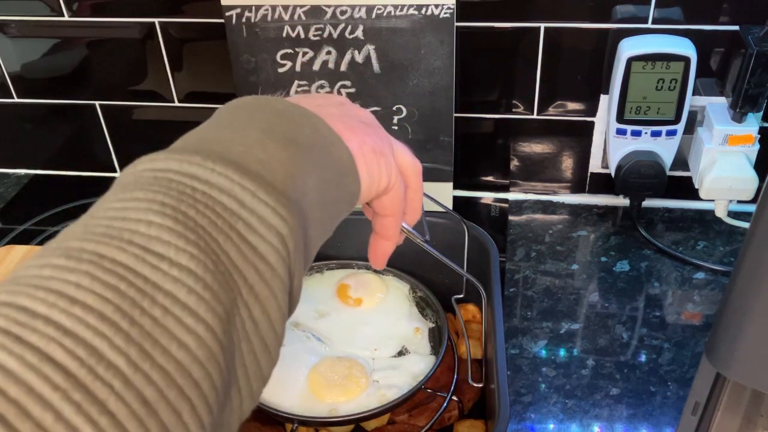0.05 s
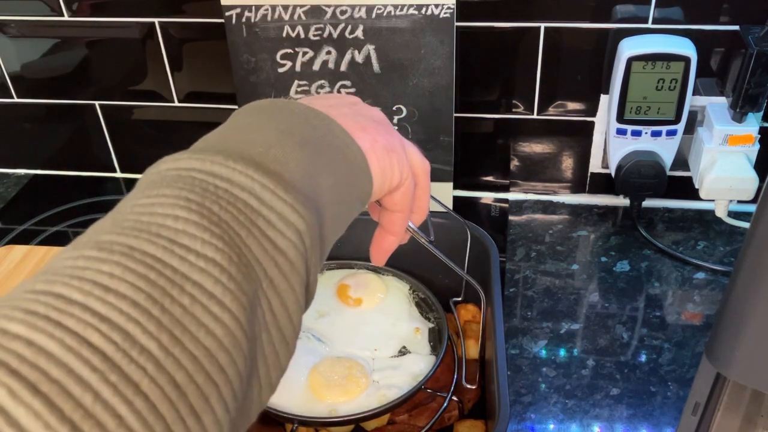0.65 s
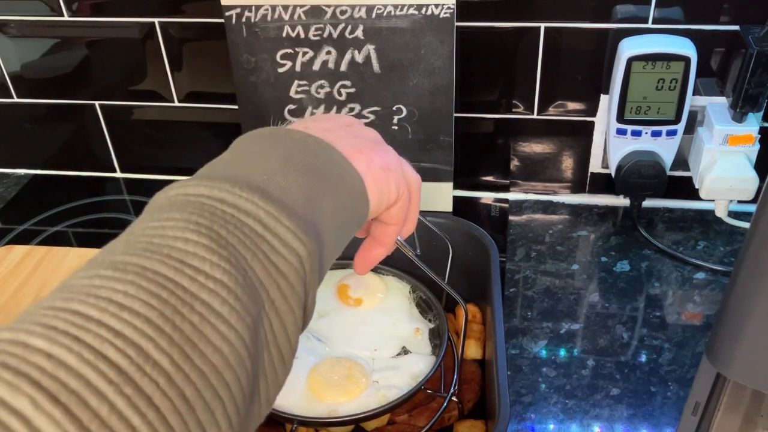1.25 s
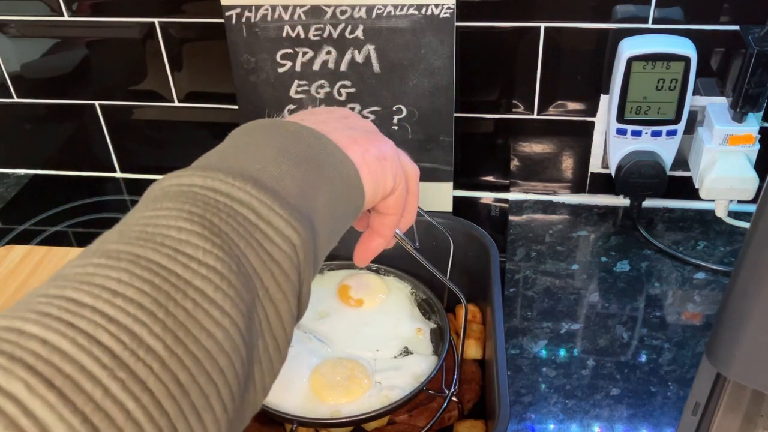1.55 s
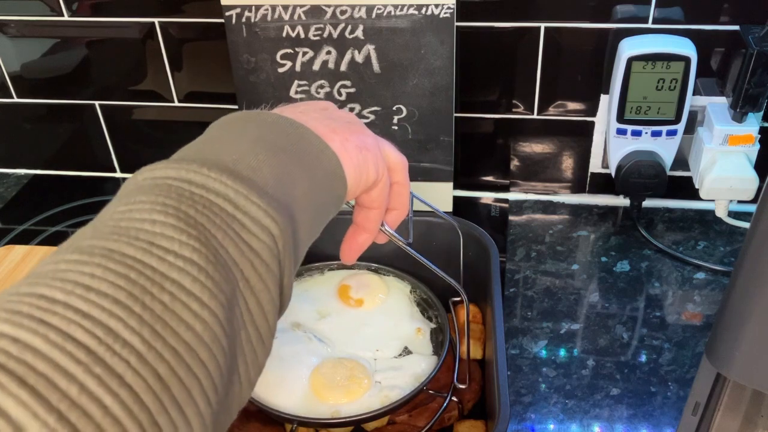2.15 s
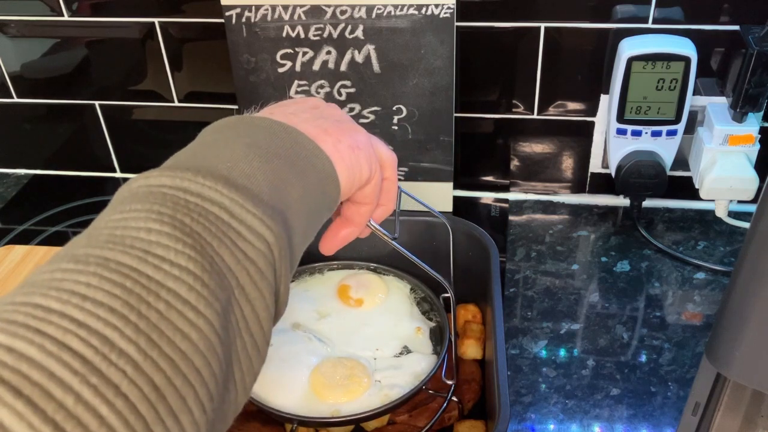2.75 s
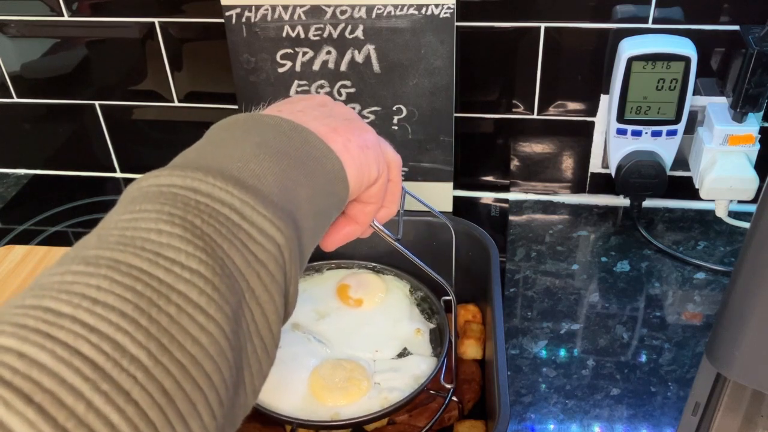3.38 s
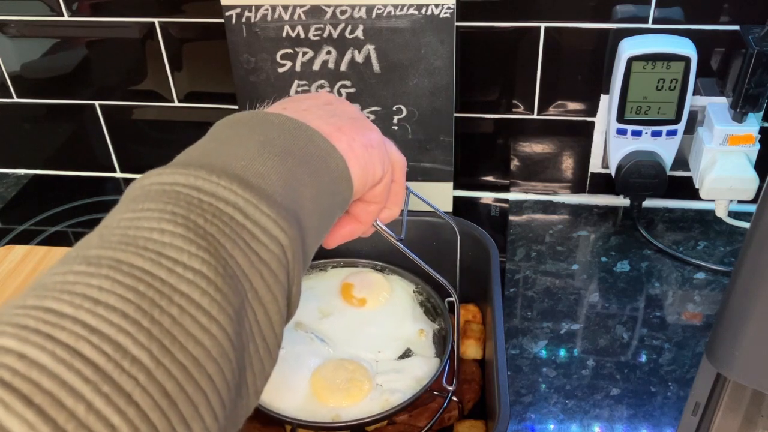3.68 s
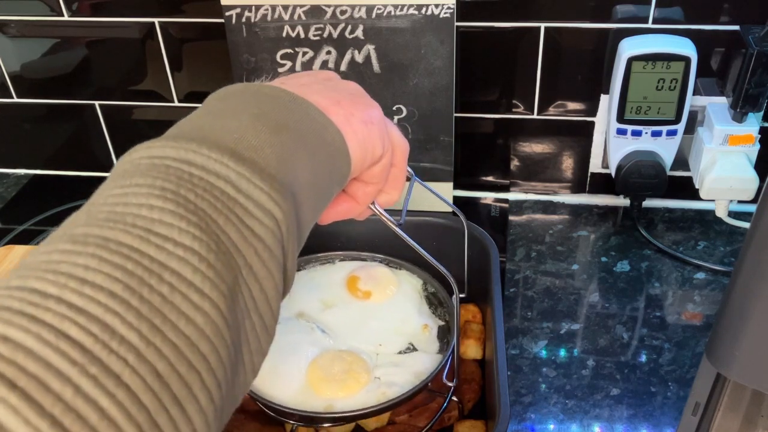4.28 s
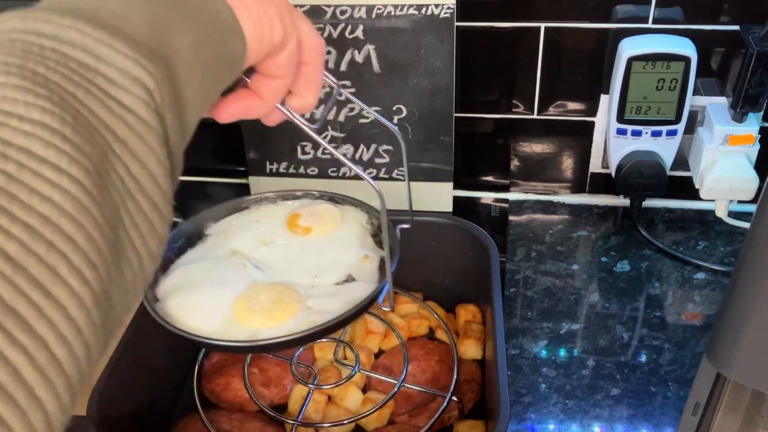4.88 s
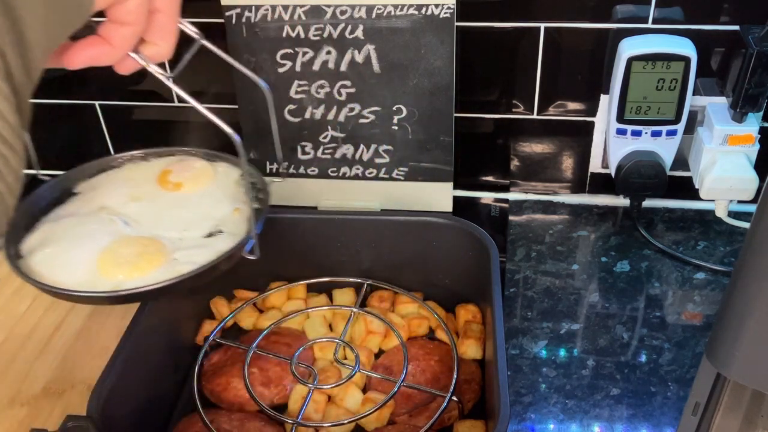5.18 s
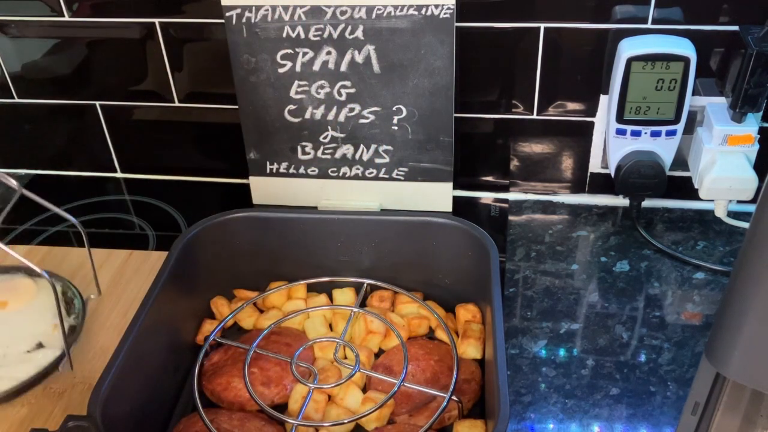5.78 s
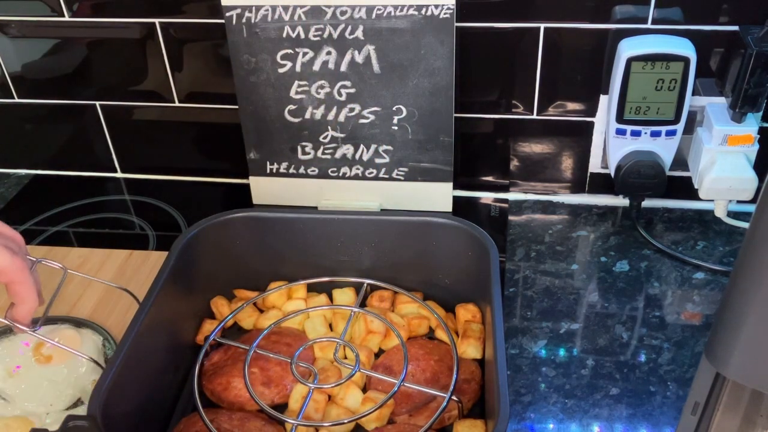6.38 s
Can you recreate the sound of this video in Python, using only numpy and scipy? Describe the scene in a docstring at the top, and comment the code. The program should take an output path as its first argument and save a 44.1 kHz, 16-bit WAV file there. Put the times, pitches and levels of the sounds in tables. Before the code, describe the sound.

A wire handle clinks against a small steel pan, which is lifted with a sleeve rustle and set down on wood with a knock.

```python
"""Lifting a pan out of a cooking basket

A small tiled kitchen, two microphones close in, with their own hiss and a faint crackle of hot food.
A wire handle is hooked onto a small steel pan on a trivet in the basket; each contact rings their modes.
The pan is lifted out with a soft rustle of a sleeve and set down on a wooden board, off to the left,
which thuds on the counter. The tiles answer each contact with a short tail."""
import sys
import numpy as np
from scipy import signal
from scipy.fft import rfft, irfft, next_fast_len
from scipy.io import wavfile
from scipy.ndimage import map_coordinates

SR = 44100
rng = np.random.default_rng(int(sys.argv[2]) if len(sys.argv) > 2 else 0)


def unload_audio(sound):
    """Save the sound as a 16-bit wav file, at the path given as the first command line argument."""
    columns = np.transpose(np.atleast_2d(sound))
    # keep every value between -1 and 1, then stretch to whole-number steps
    steps = np.round(np.clip(columns, -1, 1) * 32767)
    wavfile.write(sys.argv[1], SR, steps.astype(np.int16))


N = 283563

# the handle wire strikes the pan's lugs; where it is struck decides which three of its modes sing:
# (time [s], level [dB], basket share [dB], pan share [dB], wire share [dB], low mode [Hz],
#  middle mode [Hz], high mode [Hz], favoured basket pitch [Hz], favoured handle ping [Hz])
CLINKS = [(0.852, -44, -1, -5.5, -3.5, 1600, 2500, 5130, 460, 6750),
          (0.9893, -38.5, -6, -14, -3, 1410, 5130, 6550, 454, 12100),
          (1.0735, -38.5, -33, -37, -7, 950, 2670, 5130, 465, 9700),
          (1.113, -48.5, -13.5, -22, -3, 940, 1680, 1750, 465, 11400),
          (1.26, -58.5, -1.5, -9, -3, 930, 1605, 2580, 488, 6700),
          (1.328, -46, -19, -8.5, -0.5, 906, 1780, 5850, 465, 9900),
          (2.313, -56.5, -21, -11, -2.5, 935, 1820, 2240, 465, 11400),
          (2.397, -47, -8.5, -7, -2.5, 1680, 1740, 2700, 460, 9500),
          (2.717, -51.5, -11, -18, -6, 1410, 1810, 4240, 565, 6830)]
# ringing of the trivet: (frequency [Hz], level [dB], t60 [s])
TRIVET_MODES = [(1933, -2, .19), (2510, -2, .18), (2562, -3, .17), (2788, 1.5, .16), (3079, 2, .12),
                (3440, 0, .19), (3768, -6, .2), (4584, -1, .18), (4940, -1, .14), (5500, 2, .11),
                (6067, -5, .15), (6783, -1, .1), (7040, -1, .13), (7525, -1, .13), (7983, -3, .12),
                (11150, -3, .11)]
# high pings of the handle: (frequency [Hz], level [dB], t60 [s])
HANDLE_MODES = [(5500, -4, .09), (6390, -1, .1), (6700, -1, .1), (7030, -4, .12), (9400, 3, .08),
                (9900, 0, .08), (11310, -2, .1), (11904, 5.5, .13), (15100, -2, .07)]
# clatter of the trivet, and of the wire as it sings: (frequency [Hz], level [dB])
TRIVET_TONE = [(300, -41), (1100, -12), (2000, 3.5), (3000, 3), (7500, 3), (9000, 2.5), (12000, -2),
               (14000, -17.5)]
# clatter of the handle: (frequency [Hz], level [dB])
HANDLE_TONE = [(1000, -75), (4000, -1.5), (8000, 0), (9500, 5.5), (12200, 3), (15500, -4.5)]
# steel grating on steel: (frequency [Hz], level [dB])
SCRAPE_TONE = [(250, -19.5), (500, -4.5), (800, -11.5), (1500, -8), (2500, 4), (3500, -1.5), (4500, 1),
               (6000, -13), (7800, -9.5), (12000, -30)]


def amp(db):
    return 10 ** (np.asarray(db) / 20)


def along(points, hz):
    """Read a curve of (frequency [Hz], value) points on a log frequency axis."""
    f, v = np.transpose(points)
    return np.interp(np.log(hz + 1), np.log(f), v)


def unit(x):
    """Scaled to rms 1."""
    return x / np.sqrt(np.mean(x ** 2) + 1e-20)


def unit_attack(x):
    """Scaled to rms 1 over the first 20 ms."""
    return x / np.sqrt(np.mean(x[..., :SR // 50] ** 2) + 1e-20)


def coloured(x, spectrum, ripple_db=0, ripple_hz=200):
    """Filter x by a (frequency [Hz], gain [dB]) curve with random peaks and dips about ripple_hz apart."""
    m = 2 * next_fast_len(x.shape[-1] // 2 + 2048)
    hz = np.fft.rfftfreq(m, 1 / SR)
    ripple = map_coordinates(rng.standard_normal(512), [hz / ripple_hz], mode="mirror")
    cepstrum = irfft(np.log(amp(along(spectrum, hz) + ripple_db * np.tanh(ripple))))
    cepstrum[1:m // 2] *= 2  # folding the cepstrum makes the filter causal
    cepstrum[m // 2 + 1:] = 0
    return irfft(rfft(x, m) * np.exp(rfft(cepstrum)), m)[..., :x.shape[-1]]


def add(track, s, sound):
    """Mix a sound into the track at time s."""
    part = track[:, round(s * SR):][:, :sound.shape[-1]]
    part += sound[:, :part.shape[-1]]


def kitchen(x, wet_db):
    """A sound followed by a new tail from the tiles, different at each microphone."""
    # decay of the tiled room: (frequency [Hz], t60 [s])
    decay = [(100, 0.821), (500, 0.3), (3000, 0.34), (8000, 0.27), (15000, 0.025)]
    hz, t, noise = signal.stft(rng.standard_normal((2, SR // 2)), SR, nperseg=256)
    build_up = 1 - np.exp(-t / 0.0027)
    fade = amp(-60 * t / along(decay, hz)[:, None])
    tail = signal.istft(noise * build_up * fade, SR, nperseg=256)[1]
    wet = signal.fftconvolve(x, tail / np.linalg.norm(tail[0]), axes=1)
    return x + amp(wet_db) * wet[:, :x.shape[-1]]


def favour(hz, favoured_hz, relative_width=0.049, others_db=-9.5):
    """Gain of each mode: those near a favoured pitch stand out; with none, all are alike."""
    return amp(others_db) + sum(np.exp(-(np.log(hz / f) / relative_width) ** 2) for f in favoured_hz)


def struck(blows, modes, tone, low_hz, ring_db, clatter_t60, ripple_db, attack_s, wet_db):
    """A body hit at (time [s], level [dB], any favoured pitches [Hz]) clatters briefly and rings."""
    track, t = np.zeros((2, N)), np.arange(SR // 2) / SR
    hz, db, t60 = np.transpose(modes)
    partials = amp(db[:, None] - 60 * t / t60[:, None]) * np.exp(2j * np.pi * hz[:, None] * t)
    radiation = signal.butter(4, low_hz, "highpass", fs=SR, output="sos")  # small bodies push no bass
    for s, level, *favoured_hz in blows:
        # each mode reaches the two microphones in a slightly different phase
        phase = rng.uniform(0, 2 * np.pi, len(hz)) + rng.normal(0, 0.72, (2, len(hz)))
        strength = amp(rng.normal(0, 1.5, len(hz))) * favour(hz, favoured_hz)
        ring = ((strength * np.exp(1j * phase)) @ partials).real
        # the point of contact favours some clusters of the crowded upper modes and misses others
        burst = rng.standard_normal((2, len(t))) * amp(-60 * t / clatter_t60)
        clatter = coloured(burst, tone, ripple_db, ripple_hz=132.1)
        hit = (unit_attack(clatter) + amp(ring_db) * unit_attack(ring)) * (1 - np.exp(-t / attack_s))
        in_room = kitchen(signal.sosfilt(radiation, hit), wet_db)
        add(track, s, amp(level) * unit_attack(in_room))
    return track


def grains(per_second):
    """Friction: a random stream of tiny slips of uneven size, the same at both microphones."""
    slips = (rng.random(N) < per_second / SR) * rng.standard_normal(N)
    return np.array([slips, slips])


def hiss(level_db):
    """Microphone hiss over the faint rumble of the room."""
    # steady noise floor: (frequency [Hz], level [dB])
    tone = [(20, -27), (50, 8), (110, -7.5), (220, -9), (450, -17.5), (700, -12.5), (1100, -3.5),
            (3500, -0.5), (6000, -0.5), (8000, 4), (11000, 4.5), (15500, -1.5)]
    return amp(level_db) * unit(coloured(rng.standard_normal((2, N)), tone))


def crackle(per_second, gain_db, spread_db):
    """Hot fat on the food gives sparse, tiny pops."""
    # spectrum of a pop: (frequency [Hz], level [dB])
    tone = [(2000, -33), (8000, 0.5), (11000, 9.5), (15500, -5)]
    chance, size = rng.random(N), rng.standard_normal(N)
    pops = (chance < per_second / SR) * amp(spread_db * np.clip(size, -2, 2))
    return amp(gain_db) * coloured(np.array([pops, pops]), tone)


def sleeve(folds_per_s=16, rub_gain_db=6.5, brush_db=-70.5, focus_db=14, swish_fade_s=.035):
    """Cloth rubs unevenly as the arm moves, and swishes at its own pitch with each quick move."""
    # course of the dull rub: (time [s], relative level [dB])
    rub_levels = [(0.0, -66), (0.14, -68.5), (0.41, -60.5), (0.64, -66.5), (0.9, -71.5), (1.04, -66.5),
                  (1.5, -75), (2.99, -72), (3.37, -80.5), (4.82, -90.5), (5.59, -73.5), (5.98, -68),
                  (6.21, -66), (6.43, -74.5)]
    # spectrum of the rub: (frequency [Hz], level [dB])
    rub_tone = [(30, 4), (60, 6), (200, -14.5), (350, -3), (480, -1), (700, -4.5), (1100, -1.5),
                (3000, -12)]
    # light brushing of cloth, heard all the while: (frequency [Hz], level [dB])
    brush_tone = [(100, -18.5), (600, -7), (1000, -2), (1700, -4.5), (2500, -4.5), (4000, 0.5),
                  (9000, -15.5)]
    # quick moves of the arm: (peak time [s], level [dB], strongest pitch [Hz])
    moves = [(3.977, -57.5, 2460), (4.986, -57, 1520), (5.965, -63, 2670), (6.0, -57.5, 1070)]
    t = np.arange(N) / SR
    folds = map_coordinates(rng.standard_normal(200), [t * folds_per_s], mode="mirror")
    rub_db = np.interp(t, *np.transpose(rub_levels)) + rub_gain_db + 4.0 * folds
    rub = amp(rub_db) * unit(coloured(rng.standard_normal((2, N)), rub_tone))
    brush = unit(coloured(rng.standard_normal((2, N)), brush_tone))
    swish = amp(brush_db) * brush
    for s, db, hz in moves:
        focused = brush + amp(focus_db) * signal.lfilter(*signal.iirpeak(hz, 2, fs=SR), brush)
        swish += amp(db) * np.exp(-np.abs(t - s) / swish_fade_s) * unit(focused)
    return rub + amp(1.5 * folds) * swish


def swing():
    """As the carried pan swings, the hooks grind faintly and wake resonances of pan and handle."""
    # friction in the lugs: (time [s], level [dB])
    friction = [(5.1, -78), (5.4, -69.5), (5.6, -71), (5.78, -78), (5.95, -85.5)]
    # resonances of pan and handle: (frequency [Hz], width [Hz], gain [dB])
    resonances = [(468, 190, -4), (1820, 300, -7), (2897, 200, -16), (4250, 700, -5)]
    slips = grains(per_second=500)
    ring = sum(amp(db) * signal.lfilter(*signal.iirpeak(hz, hz / width, fs=SR), slips)
               for hz, width, db in resonances)
    swell = amp(np.interp(np.arange(N) / SR, *np.transpose(friction)))
    return kitchen(swell * unit(ring), wet_db=-1)


def scrapes():
    """Short, gritty slides of the pan on its trivet."""
    # steel slides on steel: (start [s], length [s], level [dB])
    slides = [(.256, .011, -55), (1.766, .016, -58), (1.802, .014, -44), (2.4, .03, -54), (2.945, .04, -60),
              (4.508, .04, -63)]
    t = np.arange(N) / SR
    strokes = sum(amp(db) * np.sqrt(np.abs(np.sin(np.pi * np.clip((t - s) / length, 0, 1))))
                  for s, length, db in slides)
    grit = unit(coloured(grains(per_second=1500), SCRAPE_TONE))
    return kitchen(strokes * grit, wet_db=-7.0)


def casing():
    """A push on the basket passes into the cooker's hollow casing, which answers low and softly."""
    # the basket presses on the casing: (time [s], level [dB])
    pushes = [(.269, -51.5), (.852, -64.5), (.99, -68.5), (1.26, -66), (1.816, -56.5), (2.717, -67.5),
              (2.891, -66)]
    # ringing of the casing: (frequency [Hz], level [dB], t60 [s])
    modes = [(175.4, -2.5, 0.3), (252.5, -6.5, .29), (289.7, -10, .2), (331, -2, .3)]
    # its dull clatter: (frequency [Hz], level [dB])
    tone = [(110, -6), (170, -2.5), (330, -2.5), (600, -20.5)]
    return struck(pushes, modes, tone, low_hz=110, ring_db=-4,
                  clatter_t60=0.081, ripple_db=8, attack_s=0.0051, wet_db=-6.5)


def counter(attack_s=0.01344):
    """The heavy counter top swings up slowly and booms."""
    # blows that reach the counter: (time [s], level [dB])
    thuds = [(0.272, -51), (1.817, -63), (6.049, -35), (6.236, -51)]
    # its deep modes: (frequency [Hz], level [dB], t60 [s])
    modes = [(64.9, 1, .34), (106.3, -4, .19), (120, -7, .15)]
    track, t = np.zeros((2, N)), np.arange(SR) / SR
    boom = sum(amp(db - 60 * t / t60) * np.sin(2 * np.pi * hz * t) for hz, db, t60 in modes)
    boom *= 1 - np.exp(-t / attack_s)
    for s, db in thuds:
        add(track, s, amp(db) * boom[None] / np.abs(boom).max())
    return track * amp([[-.7], [.7]])  # a touch to the right


def board():
    """The pan knocks on the board, off to the left, then rocks to rest with duller bumps."""
    # the pan meets the board: (time [s], level [dB])
    set_down = [(6.0483, -32.5), (6.185, -47), (6.207, -55), (6.395, -57.5)]
    # ringing of the wood: (frequency [Hz], level [dB], t60 [s])
    modes = [(237, -5, .12), (333, -4, .11), (417, -4, .13), (510, 3, .1), (612, 1, .1), (720, 4, .08),
             (1177, -5, .1), (1300, 10, .025)]
    # its clatter: (frequency [Hz], level [dB])
    tone = [(80, -29), (300, 1.5), (700, 5), (1350, -3.5), (1900, -8.5), (2700, -19.5), (4200, -19),
            (15000, -25)]
    # a gentle contact lasts longer and loses its treble: (frequency [Hz], gain [dB])
    soft_contact = [(1300, 3), (3200, -34)]
    landing, rocking = (struck(blows, modes, tone, low_hz=145, ring_db=-6,
                               clatter_t60=0.096, ripple_db=-2.5, attack_s=0.00089, wet_db=-8.5)
                        for blows in (set_down[:1], set_down[1:]))
    return (landing + coloured(rocking, soft_contact)) * amp([[2], [-2]])


def hook():
    """The hook slips in its lug, creeps as it takes the weight and clicks as the pan lands."""
    # short, bright slips: (time [s], level [dB])
    slips = [(3.283, -39), (3.821, -59.5), (3.858, -60.5), (4.165, -63.5), (5.534, -74), (5.673, -64),
             (5.733, -65), (6.052, -47)]
    # ringing of the hook: (frequency [Hz], level [dB], t60 [s])
    modes = [(2534, -5, 0.049), (3380, -27, 0.053), (3750, 18, 0.061), (4220, 4, 0.036), (5320, -25, 0.073)]
    # its clatter: (frequency [Hz], level [dB])
    tone = [(300, -14.5), (1700, -14.5), (2500, -13), (3400, 0.5), (4200, 5), (5200, -6), (5800, -22),
            (8000, -12.5), (15000, -42.5)]
    return struck(slips, modes, tone, low_hz=254, ring_db=-12,
                  clatter_t60=0.035, ripple_db=-5.5, attack_s=0.0011, wet_db=-8.0)


def ticks():
    """Grazing touches give a tiny dry tick with almost no ring."""
    # the handle wire just touches its lug: (time [s], level [dB])
    touches = [(.9635, -58), (1.2205, -54.5), (2.412, -52), (2.917, -50)]
    return struck(touches, HANDLE_MODES, HANDLE_TONE, low_hz=2000, ring_db=-20,
                  clatter_t60=.006, ripple_db=2, attack_s=.0002, wet_db=-16)


def chatter():
    """Quick, dry rebounds roughen the tail of the hard clank."""
    # the pan rebounds on the trivet: (time [s], level [dB])
    rebounds = [(1.8335, -40), (1.848, -39.5), (1.859, -45), (1.872, -48)]
    return struck(rebounds, TRIVET_MODES, SCRAPE_TONE, low_hz=800, ring_db=-15.5,
                  clatter_t60=0.02, ripple_db=4, attack_s=0.0005, wet_db=-8)


def wire():
    """The handle wire sings briefly after each clink, at pitches set by where it was struck."""
    # bending modes of the wire: (frequency [Hz], level [dB], t60 [s])
    modes = [(861, 4.5, 0.079), (958, 2.5, 0.039), (1400, 0, 0.038), (1632, -14, 0.23), (1760, -8, 0.091),
             (1800, 0, 0.048), (1980, -4, 0.17), (2490, 2.5, 0.09), (2560, -8, 0.08), (4240, 4, 0.043),
             (5300, -1.5, 0.12), (6560, -2, 0.13)]
    blows = [(s, db + to_wire, *sung_hz) for s, db, _, _, to_wire, *sung_hz, _, _ in CLINKS]
    return struck(blows, modes, TRIVET_TONE, low_hz=600, ring_db=9,
                  clatter_t60=0.024, ripple_db=11, attack_s=0.00054, wet_db=-8.5)


def contacts(second_touch_s=.0042, clink_to_rim_db=-14):
    """Share each contact out as blows on basket, rim, pan, trivet and handle."""
    # the pan lurches on its trivet and touches twice:
    # (time [s], basket [dB], rim [dB], pan [dB], trivet [dB], second touch over the first [dB])
    clanks = [(0.268, -45.5, -41.5, -31.5, -41, 3), (1.8146, -27, -30, -49, -22, -5)]
    # the pan nudges the basket wall, or swings on its handle as it is carried:
    # (time [s], level [dB], rim share [dB], pan share [dB], favoured basket pitch [Hz])
    knocks = [(0.096, -59.5, -4, -8, 567), (0.327, -53.5, 7, -5, 463), (0.443, -60.5, 1, -14, 470),
              (0.489, -59.5, 7.5, -14, 460), (0.51, -60, 3, 1, 470), (0.868, -47, -8, 2, 555),
              (1.236, -65, 4.5, 6.5, 457), (2.291, -63, -2, 4, 460), (2.891, -53.5, -4, -12, 500),
              (2.902, -52, -21, -24, 570), (2.919, -64.5, -3, 4, 573), (3.017, -58, -14, -5.5, 543),
              (3.75, -68, -4, -8, 512), (5.178, -81, 15, -15, 465)]
    bowl_hz = 1610  # a light touch wakes mainly the pan's bowl mode
    wakes_db, db_per_db = -51.5, 0.53  # above this strength the handle outrings the trivet, at this rate
    basket, rim, pan, trivet, handle = [], [], [], [], []
    for s, basket_db, rim_db, pan_db, trivet_db, second_db in clanks:
        basket.append((s, basket_db))  # the slow basket wall feels both touches as one push
        for delay, db in ((0, 0), (second_touch_s, second_db)):
            rim.append((s + delay, rim_db + db))
            pan.append((s + delay, pan_db + db))
            trivet.append((s + delay, trivet_db + db))
    for s, db, to_basket, to_pan, *_, basket_hz, ping_hz in CLINKS:
        basket.append((s, db + to_basket, basket_hz))
        rim.append((s, db + clink_to_rim_db))
        pan.append((s, db + to_pan, bowl_hz))
        trivet.append((s, db))
        handle.append((s, db + db_per_db * (db - wakes_db), ping_hz))  # harder is brighter
    for s, db, to_rim, to_pan, basket_hz in knocks:
        basket.append((s, db, basket_hz))
        rim.append((s, db + to_rim))
        pan.append((s, db + to_pan, bowl_hz))
    return basket, rim, pan, trivet, handle


def clinks():
    """Close to the microphones, the hollow basket, its rim, pan, trivet and handle ring when struck."""
    # ringing of the basket: (frequency [Hz], level [dB], t60 [s])
    basket_modes = [(415, -13, .17), (470, -1, .13), (495, 10, .045), (533, -3, .16), (565, 1, .21)]
    # its clatter: (frequency [Hz], level [dB])
    basket_tone = [(150, -30), (300, -20), (400, -4), (490, 5), (580, 3), (680, -1), (1100, -21.5),
                   (3000, -33.5)]
    # ringing of the rim: (frequency [Hz], level [dB], t60 [s])
    rim_modes = [(669, -5, 0.093), (725, -4, 0.2), (869.8, 2.5, 0.094), (952, 4, 0.11), (928, -2.5, 0.084)]
    # its clatter: (frequency [Hz], level [dB])
    rim_tone = [(100, -50), (500, -15.5), (680, -6), (980, 9), (1100, -13), (1350, -1.5), (3000, -41)]
    # ringing of the steel pan: (frequency [Hz], level [dB], t60 [s])
    pan_modes = [(963, -12, .28), (1269, -13, .14), (1453, -6, .09), (1597, 8, .075), (1628, -11, .32),
                 (1933, -17, .25), (2093, -9, .16), (2670, -9, .16), (2789, -4.5, .14), (3079, -9, .28),
                 (3548, -13, .2), (3784, -12, .17)]
    # its clatter: (frequency [Hz], level [dB])
    pan_tone = [(150, 0), (600, -16), (1100, -10.5), (1550, 5.5), (1850, -2), (2350, 0.5), (2900, -6),
                (4000, -1.5), (4800, -19), (8000, -21.5)]
    on_basket, on_rim, on_pan, on_trivet, on_handle = contacts()
    basket = struck(on_basket, basket_modes, basket_tone, low_hz=300, ring_db=4,
                    clatter_t60=0.035, ripple_db=2, attack_s=0.0025, wet_db=-12)
    rim = struck(on_rim, rim_modes, rim_tone, low_hz=514, ring_db=-0.5,
                 clatter_t60=0.026, ripple_db=4.5, attack_s=0.00255, wet_db=-5.0)
    pan = struck(on_pan, pan_modes, pan_tone, low_hz=227, ring_db=2,
                 clatter_t60=0.047, ripple_db=3.5, attack_s=0.0015, wet_db=-8.5)
    trivet = struck(on_trivet, TRIVET_MODES, TRIVET_TONE, low_hz=611, ring_db=-6,
                    clatter_t60=0.065, ripple_db=3, attack_s=0.0004, wet_db=-8.5)
    handle = struck(on_handle, HANDLE_MODES, HANDLE_TONE, low_hz=1200, ring_db=-6,
                    clatter_t60=0.089, ripple_db=6, attack_s=0.00047, wet_db=-13.5)
    return basket + (rim + pan) * amp([[1.5], [-2]]) + trivet + handle  # rim and pan sit to the left


def scene():
    """Metal and wood contacts over the sleeve, the hot food and the hiss."""
    hits = clinks() + wire() + chatter() + ticks() + hook() + casing() + board() + counter()
    friction = scrapes() + swing() + sleeve()
    background = crackle(per_second=15, gain_db=-38.5, spread_db=-0.5) + hiss(level_db=-56.5)
    return hits + friction + background


def record(dry):
    """The close pair: near mono in the bass; alike in the treble too, but the left late and inverted."""
    # stereo width: (frequency [Hz], left-right difference kept [share])
    width = [(60, 0.3), (350, 0.44), (700, 0.62), (1500, 0.88), (5500, 1), (7000, 0.1), (12000, 0.09)]
    treble_hz, left_delay_s, top_hz = 5500, .00022, 16000
    m = next_fast_len(N + SR // 4)
    hz = np.fft.rfftfreq(m, 1 / SR)
    low_cut = signal.butter(3, 38, "highpass", fs=SR, output="sos")
    left, right = rfft(signal.sosfilt(low_cut, dry), m)
    spread = np.clip(along(width, hz), 0, 1)
    mid, side = (left + right) / 2, spread * (left - right) / 2
    treble_phase = np.pi - 2 * np.pi * hz * left_delay_s
    left_phase = np.where(hz > treble_hz, treble_phase, 1.8 * (hz / treble_hz) ** 1.5)
    pair = np.array([(mid + side) * np.exp(1j * left_phase), mid - side])
    pair *= np.sqrt(2 / (1 + spread ** 2))  # make up the power lost by narrowing
    high_cut = 1 / (1 + (hz / top_hz) ** 160)
    return irfft(pair * high_cut, m)[:, :N]


dry = scene()
out = record(dry)
unload_audio(out)
```